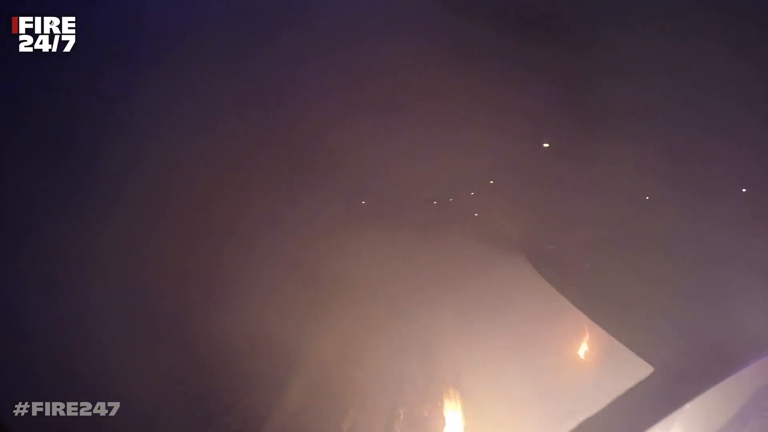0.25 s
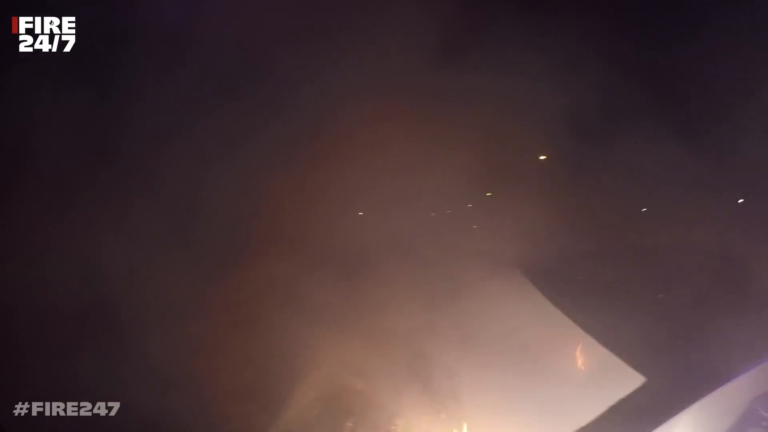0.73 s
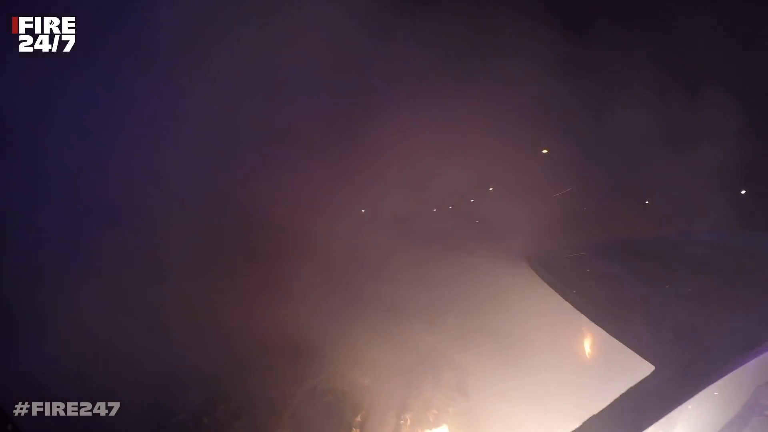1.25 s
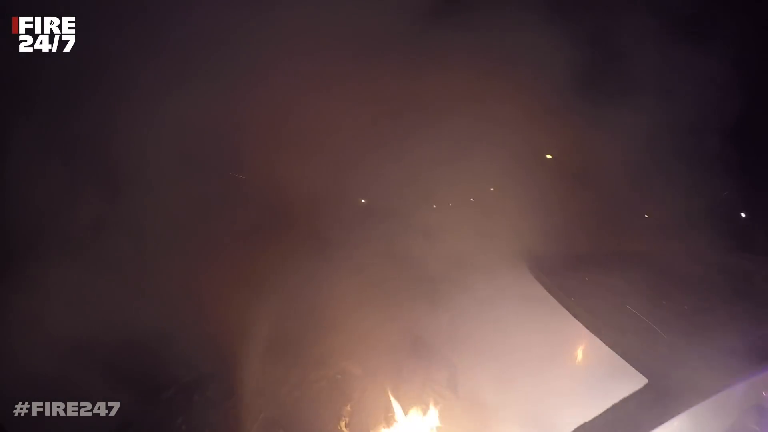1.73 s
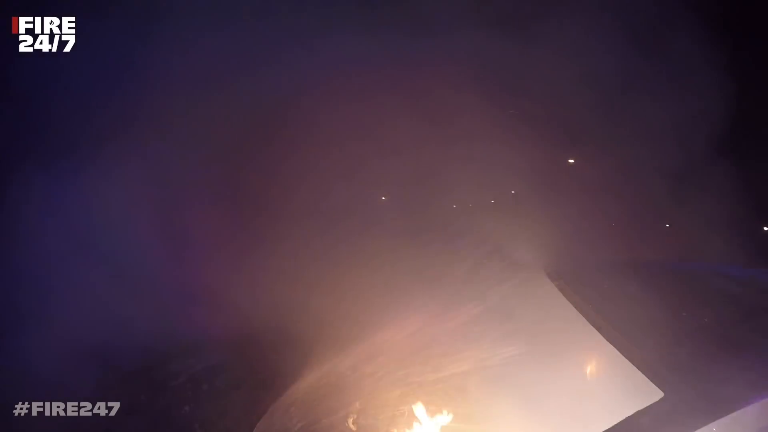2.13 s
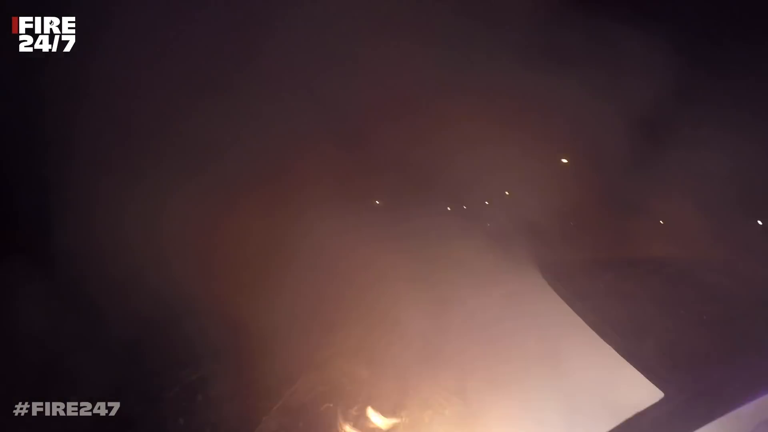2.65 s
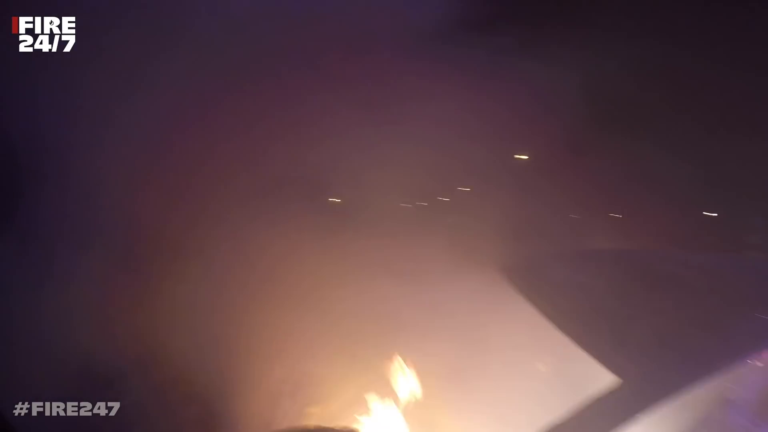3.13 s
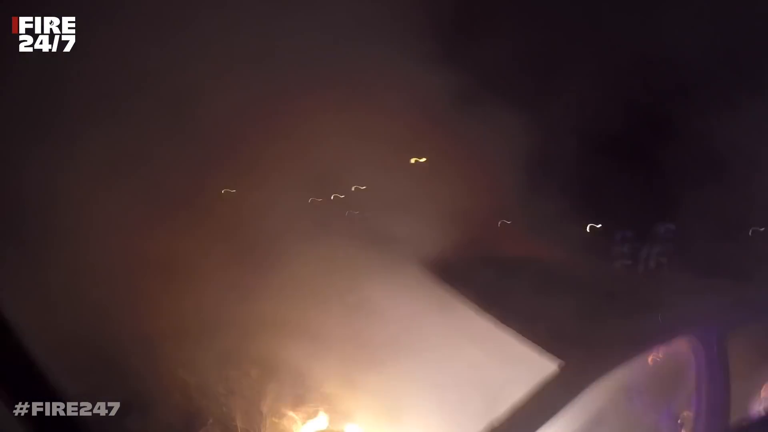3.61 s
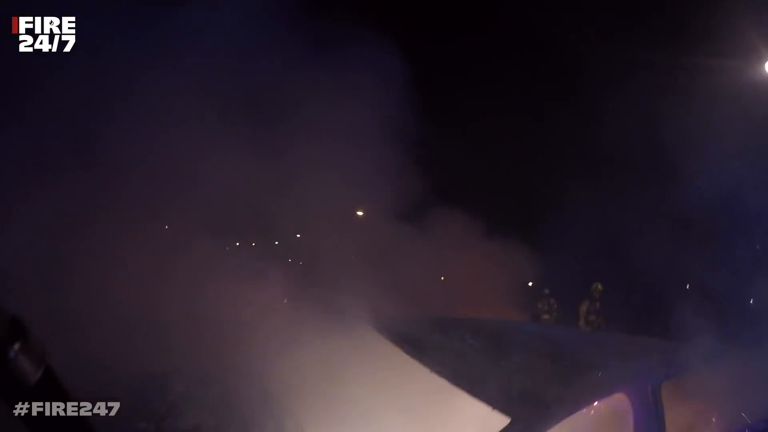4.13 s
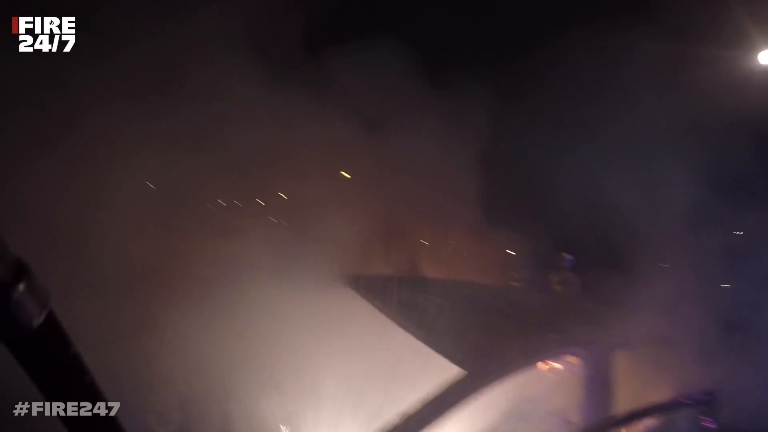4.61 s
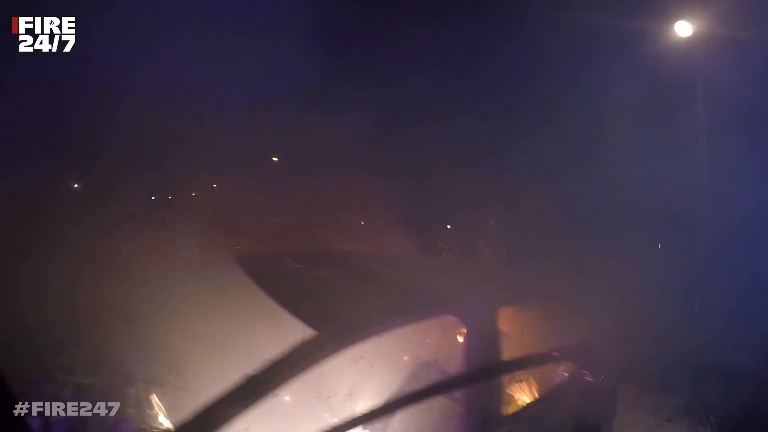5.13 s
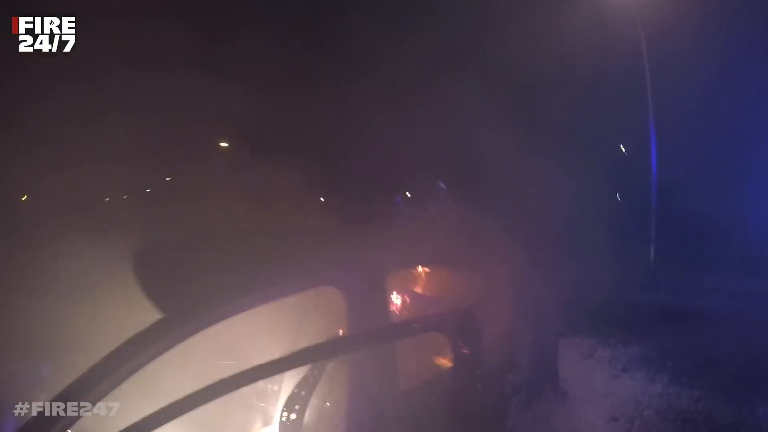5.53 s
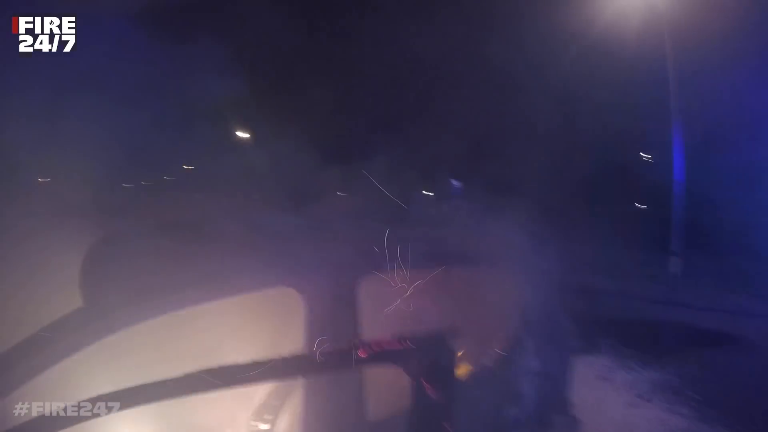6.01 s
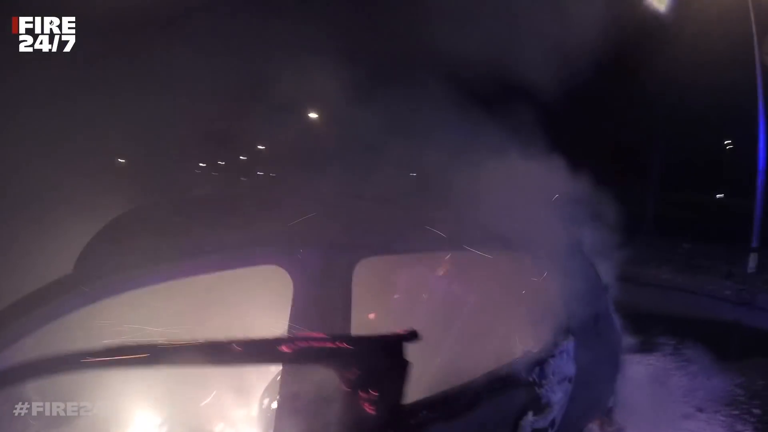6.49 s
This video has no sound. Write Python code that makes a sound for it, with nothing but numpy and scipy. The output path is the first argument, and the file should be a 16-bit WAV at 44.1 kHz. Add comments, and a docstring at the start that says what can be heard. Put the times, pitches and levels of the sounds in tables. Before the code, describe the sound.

Harsh, boxy water spray sweeps across hot car metal, surging and sizzling, briefly dropping out midway as thumps and sharp knocks hit the helmet.

```python
"""A hose jet sweeps over a burning car, heard by a mono camera in a closed housing on a helmet.
From the start water roars, drums on metal, sprays and flashes to steam: noise gated by drops, coloured by the
housing's peaks and dips. Air and movement rumble below it as slow-varying low noise.
From 0.9 s slugs of water slap as noise bursts; from 3.2 s bumps thump as swelling low tones.
The level dips briefly at 3.6 and 3.8 s; from 3.7 s knocks ring the shell as decaying modes."""
import sys
import numpy as np
from scipy import signal
from scipy.fft import rfft, irfft
from scipy.io import wavfile
from scipy.ndimage import uniform_filter1d

SR = 44100
rng = np.random.default_rng(int(sys.argv[2]) if len(sys.argv) > 2 else 0)


def log_audio(samples):
    """Write samples as a 16-bit WAV file to the path given in sys.argv[1]."""
    # one column per channel
    frames = np.atleast_2d(samples).T
    # limit to full scale, then quantise
    limited = np.clip(frames, -1, 1)
    pcm = np.round(limited * 32767).astype(np.int16)
    wavfile.write(sys.argv[1], SR, pcm)


def attenuation_scalar(level_db):
    """Turn a level in dB into a linear amplitude multiplier (20 dB per decade)."""
    decades = np.asarray(level_db, float) / 20
    return 10 ** decades


N = 298116
T = np.arange(N) / SR
HZ = np.fft.rfftfreq(N, 1 / SR) + 1e-3


def unit(x):
    """Scale to rms 1."""
    return x / np.sqrt(np.mean(x ** 2))


def band(x, lo_hz, hi_hz, order=4):
    """Zero-phase band-pass with rounded skirts."""
    low_skirt = 1 + (lo_hz / HZ) ** (2 * order)
    high_skirt = 1 + (HZ / hi_hz) ** (2 * order)
    return irfft(rfft(x) / np.sqrt(low_skirt * high_skirt), N)


def walk(rate_hz):
    """Random levels held 1 / rate_hz and slewed twice; rms 1."""
    hold = int(SR / rate_hz)
    steps = np.repeat(rng.standard_normal(N // hold + 1), hold)
    return unit(uniform_filter1d(uniform_filter1d(steps, hold), hold)[:N])


def swells(rows, rise_s, fall_s):
    """Summed level changes in dB that rise, hold and fall back."""
    total_db = np.zeros(N)
    for start_s, change_db, hold_s in rows:
        corners_s = np.cumsum([0, rise_s, hold_s, fall_s])
        total_db += change_db * np.interp(T - start_s, corners_s, [0, 1, 1, 0])
    return total_db


# broad slope of the housing: (frequency [Hz], gain [dB])
HOUSING_SLOPE = [(150, -15), (500, -16), (1000, -9), (2000, -4.5), (4000, -15.5), (6000, -19.5),
                 (9000, -27), (15000, -38)]
# housing peaks and dips: (centre [Hz], width [Hz], gain facing the jet [dB], gain turned away [dB])
HOUSING_PEAKS = [(698, 29, 9, 4.5), (1363, 30, 5, 5.5), (1520, 110, -6, -2.5), (1760, 750, 1.5, 6),
                 (2354, 79, -5.5, -17), (2506, 84, -14, 3.5), (2927, 120, 7.5, -3), (3106, 104, 1, -8.5),
                 (3398, 535, 12.5, 10.5), (4060, 460, -4.5, 4.5), (4590, 110, -3, 2), (4860, 330, 8, -6),
                 (5485, 210, -16, 1), (5934, 580, -12, -11.5), (6200, 130, 3.5, 1), (6980, 210, 9, -3),
                 (8100, 1900, -4.5, -7.5), (9250, 590, 4.5, 4)]
# head turned away from the jet: (time [s], share [0-1])
HEAD_TURN = [(0, 0.31), (1.0, 0.24), (1.7, 0.18), (2.0, 0.45), (2.6, 0.13), (2.8, 0.62), (3.05, 0),
             (3.3, 0.53), (4.3, 0.46), (4.6, 0.44), (4.8, .9), (5.05, 0.53), (5.6, 0.78), (5.9, 0.8),
             (6.1, 0.95), (6.76, 0.77)]


def housing(x):
    """Minimum-phase filters of the housing, facing and turned away, crossfaded as the head turns."""
    hz = np.fft.rfftfreq(4096, 1 / SR) + 1
    slope_hz, slope_gain_db = np.transpose(HOUSING_SLOPE)
    slope_db = np.interp(np.log(hz), np.log(slope_hz), slope_gain_db)
    away = np.interp(T, *np.transpose(HEAD_TURN))
    out = np.zeros(N)
    for side, share in enumerate([1 - away, away]):
        gain_db = slope_db.copy()
        for row in HOUSING_PEAKS:
            gain_db += row[2 + side] / (1 + (2 * (hz - row[0]) / row[1]) ** 2)
        # folding the cepstrum makes the response causal
        cepstrum = irfft(np.log(attenuation_scalar(gain_db)))
        cepstrum[1:2048] *= 2
        cepstrum[2049:] = 0
        impulse = irfft(np.exp(rfft(cepstrum)))[:2048]
        out += share * signal.oaconvolve(x, impulse)[:N]
    return out


def splashes(per_s, tail_s):
    """Gating by drops: equal sudden rises at random times, each dying away fast; rms 1."""
    hits = (rng.random(N) < per_s / SR).astype(float)
    return unit(signal.lfilter([1], [1, -np.exp(-1 / (tail_s * SR))], hits))


def patchy(x, lo_hz, hi_hz, slow_db, quick_db):
    """Five slices of the spectrum swell and flicker on their own, as drop sizes and targets change."""
    inner_hz = np.geomspace(lo_hz, hi_hz, num=6)[1:-1]
    spectrum = rfft(x)
    out = np.zeros(N)
    for from_hz, to_hz in zip([0, *inner_hz], [*inner_hz, SR]):
        part = irfft(spectrum * (HZ >= from_hz) * (HZ < to_hz), N)
        out += part * attenuation_scalar(slow_db * walk(7) + quick_db * walk(40))
    return out


# where the jet is aimed: (time [s], spray [dB], landing on metal [dB], heat of the target [dB])
JET_AIM = [(0, -31.5, -3.5, -2), (.44, -29.5, -1, -4.5), (.56, -23.5, 3, 1.5), (.75, -22.5, 2, -2),
           (.87, -23.5, 2.5, -4), (1.02, -24, 0, -3), (1.2, -27, 4.5, -2), (1.4, -25, 3, -4.5),
           (1.7, -22.5, 2, -1.5), (1.9, -18.5, 1, -2.5), (2.03, -23.5, -2, -2), (2.45, -22.5, 0, -2.5),
           (2.55, -27, 3.5, 2), (2.8, -25, -1.5, -4.5), (3.28, -25, 4, -3), (3.5, -25, -2.5, 1.5),
           (3.57, -36.5, -5, -4.5), (3.69, -44.5, -9, -5), (3.76, -45, -5, -10), (3.88, -37, 2, -2),
           (3.93, -24.5, -3.5, 2), (4.43, -31.5, 0.5, 2.5), (4.56, -22.5, -1.5, -0.5), (5.1, -24.5, -1, 2),
           (5.7, -26, -1, 0), (5.86, -30, -0.5, 3), (6.0, -28.5, -1, 2), (6.76, -25, -2.5, 2)]
# jet surges, or falters when negative: (start [s], change [dB], hold [s])
JET_SURGES = [(0, 3, .01), (.03, -3, .03), (.09, 2, 0.009), (.33, 0.5, 0.022), (.6, 1.5, 0.095),
              (.74, -2.5, .03), (.83, 3.5, 0.21), (1.3, -5, 0.013), (1.39, 3, 0.099), (2.08, 2.5, 0.047),
              (2.86, 5, 0.03), (3.0, 7.5, 0.014), (3.1, 6, 0.085), (3.29, 5, 0.067), (3.38, 6, 0.046),
              (3.99, 2.5, 0.032), (4.12, -1.5, 0.009), (4.21, -1.5, 0.0083), (4.575, 5, 0.11),
              (4.71, 3, .07), (4.82, -4, 0.011), (4.87, 3.5, .17), (5.23, 3.5, .04), (5.72, -1, 0.064),
              (5.88, 6.5, 0.026), (6.38, -5.5, 0.006), (6.46, 0.5, 0.056)]
# fire flares and is beaten down, and the roar with it: (time [s], change [dB])
FLAME_LEVELS = [(0, -1), (.8, -0.5), (1.5, 3), (2.8, 3), (3.3, -1.5), (3.7, -3), (4.2, 0.5), (4.8, -3.5),
                (5.3, 0.5), (5.7, -2), (6.0, 2), (6.76, 2.5)]
# flashes to steam on hotter metal, or cooler when negative: (start [s], change [dB], hold [s])
STEAM_FLASHES = [(.05, -2, .08), (.5, 2, 0.065), (.66, 1, .07), (1.44, 4.5, 0.075), (2.04, -0.5, .03),
                 (2.12, 3, .15), (2.72, -3.5, 0.11), (3.13, 5, 0.073), (3.22, -1.5, .12), (4.25, 2, .08),
                 (4.7, 1.5, 0.13), (5.1, 2.5, 0.34), (5.74, -1.5, .08), (5.87, 2.5, 0.057), (6.08, 1, .04),
                 (6.35, -3, 0.024)]


def jet():
    """Roar, drumming, spray and steam: bands of noise sharing the surging of the jet and the patter of drops."""
    usual_db, rise_s, fall_s = -25, 0.024, 0.064
    s, *columns = np.transpose(JET_AIM)
    aim_db, metal_db, heat_db = (np.interp(T, s, column) for column in columns)
    change_db = aim_db + swells(JET_SURGES, rise_s, fall_s) - usual_db
    # dB re spray at the usual jet, plus the share of its changes that each part follows
    roar_db = -16.5 + 0.33 * change_db + np.interp(T, *np.transpose(FLAME_LEVELS))
    drum_db = -4.5 + 0.56 * change_db + metal_db
    steam_db = -12 + 0.58 * change_db + heat_db + swells(STEAM_FLASHES, rise_s, fall_s)
    # (low [Hz], high [Hz], level [dB], patter share, surge [dB], slow patches [dB], quick patches [dB])
    parts = [(154.3, 672, roar_db, 0.29, 0.19, 2.87, 0.37),
             (820, 2035, drum_db, 0.19, 0.53, 1.05, 1.2),
             (2387, 6570, change_db, 0.18, 0.38, 1.3, 1.3),  # spray
             (5310, 16400, steam_db, 0.16, 1.0, 0.53, 1.1)]
    surge, patter = walk(45), splashes(per_s=250, tail_s=0.0018)
    out = np.zeros(N)
    for lo_hz, hi_hz, level_db, share, surge_db, slow_db, quick_db in parts:
        gate = 1 + share * (patter - 1)
        water = rng.standard_normal(N) * gate * attenuation_scalar(surge_db * surge)
        coloured = band(housing(water), lo_hz, hi_hz, order=6)
        part = patchy(coloured, lo_hz, hi_hz, slow_db, quick_db)
        out += unit(part) * attenuation_scalar(usual_db + level_db)
    return out


# how hard air and wearer move: (time [s], buffeting [dB], shell boom [dB])
RUMBLE_LEVELS = [(0, -34.5, -54.5), (.45, -39.5, -47.5), (.9, -37, -50.5), (1.3, -39.5, -50),
                 (2.0, -39, -39), (2.6, -43, -44.5), (2.9, -34.5, -51.5), (3.5, -31.5, -39),
                 (3.85, -26.5, -37), (4.1, -33.5, -37.5), (4.4, -29, -41), (4.6, -37.5, -35),
                 (5.3, -35.5, -37.5), (5.6, -25, -39.5), (5.83, -34, -48), (6.0, -30, -36.5),
                 (6.2, -30, -47), (6.5, -36, -51.5), (6.76, -32.5, -41.5)]
# gusts on the port: (start [s], change [dB], hold [s])
AIR_GUSTS = [(0.244, 5, .02), (0.476, 11, 0.032), (.68, 5, .03), (0.856, 7, .04), (1.34, 5, .04),
             (1.5, 8, .05), (1.84, 5, .05), (2.374, 5, 0.034), (2.52, 6, .02), (3.05, 5, 0.033),
             (3.53, 6, 0.035), (4.088, 11, .04), (4.28, 7, 0.035), (4.383, 4, .02), (6.607, 7.5, 0.035)]
# shakes that make the shell boom: (start [s], change [dB], hold [s])
SHELL_SHAKES = [(0, 10.5, .03), (.16, 6, 0.018), (.42, 5, 0.092), (.69, 10, .05), (1.0, 9, .03),
                (1.347, 10.5, 0.027), (1.513, 10, 0.14), (2.03, 6.5, 0.063), (2.38, 2.5, 0.034),
                (2.605, 10, .02), (2.96, 7, .03), (3.192, 18.5, 0.024), (3.838, 7.5, 0.065),
                (5.434, 11, 0.023), (5.7, 6, .03), (6.605, 10.5, .04)]


def rumble():
    """Air buffets the port in gusts; the helmet shell booms near its lowest mode: two bands of low noise."""
    s, air_db, boom_db = np.transpose(RUMBLE_LEVELS)
    air = rng.standard_normal(N) * attenuation_scalar(2.0 * walk(30))
    shaking = rng.standard_normal(N) * attenuation_scalar(1.15 * walk(25))
    out = np.zeros(N)
    for push, db, rows, lo_hz, hi_hz, order in [(air, air_db, AIR_GUSTS, 16, 40, 2),
                                                (shaking, boom_db, SHELL_SHAKES, 100, 124, 6)]:
        level_db = np.interp(T, s, db) + swells(rows, rise_s=0.03, fall_s=0.085)
        steady_rms = np.std(band(push, lo_hz, hi_hz, order))
        out += band(push * attenuation_scalar(level_db), lo_hz, hi_hz, order) / steady_rms
    # the padding passes little above the boom
    return band(out, 4.4, 125, order=5)


# heavy slaps of water: (time [s], level at onset before the housing [dB])
WATER_SLAPS = [(.9258, 2), (3.0362, 4), (3.386, 4), (5.9215, 1), (4.6002, 10)]


def slaps():
    """A slug of water lands at once: a sharp noise burst with a short tail, through the housing."""
    gate = np.zeros(N)
    for s, level_db in WATER_SLAPS:
        gate += attenuation_scalar(level_db) * (T >= s) * np.exp(-np.abs(T - s) / 0.0035)
    return band(housing(gate * rng.standard_normal(N)), 1700, 4600, order=2)


# soft bumps on the helmet: (time [s], envelope peak [dB], tone [Hz], rise [s], sign)
HELMET_BUMPS = [(3.225, -16, 65, .012, 1), (4.187, -12, 205, .007, -1), (3.985, -11, 30, .016, -1),
                (3.7045, -7, 66, .008, 1), (3.7385, -14, 100, .005, 1), (3.948, -7, 40, .012, 1),
                (4.186, -4, 125, .005, -1), (5.618, -12, 48, .011, 1), (6.042, -13, 36, .02, 1),
                (6.088, -16, 60, .007, 1), (6.292, -5, 70, .008, 1), (6.333, -15, 36, .018, -1)]


def thumps():
    """A padded blow swings the capsule: a swell and fade on a low tone."""
    out = np.zeros(N)
    for s, peak_db, hz, rise_s, sign in HELMET_BUMPS:
        t = np.maximum(T - s, 0)
        envelope = t / rise_s * np.exp(1 - t / rise_s)
        out += sign * attenuation_scalar(peak_db) * envelope * np.sin(2 * np.pi * hz * t)
    return out


# the sound drops out briefly: (time [s], depth [dB], width [s])
LEVEL_DIPS = [(3.629, -17, .006), (3.786, -15, .005)]


def dips():
    """Gain with brief bell-shaped dips in dB."""
    return attenuation_scalar(sum(depth_db * np.exp(-((T - s) / width_s) ** 2) for s, depth_db, width_s in LEVEL_DIPS))


# hard knocks on the shell: (time [s], peak [dB], hardness [dB per octave], rattle length [s])
SHELL_KNOCKS = [(3.681, -36, 8, .004), (6.294, -23, -1, .012), (6.335, -26, -1, .012),
                (3.7036, -17, -4, .004), (3.7294, -6.5, 4, .0035), (4.1843, 6, 3, .0035)]
# what the shell rings with: (mode [Hz], level at 1500 Hz tilt pivot [dB], t60 [s])
SHELL_MODES = [(310, -5, 0.072), (383, -4.5, 0.039), (512, -3.5, 0.03), (780, 2.5, 0.0098),
               (1050, 0.5, 0.012), (1390, -4, 0.013), (1940, 5.5, 0.0085), (2200, 3, 0.027),
               (2480, 2, 0.0041), (2900, -12, .008), (3360, -15, .008), (4560, -20, .008),
               (5830, -24, 0.0042), (6900, -29, .006), (9400, -37, .005)]


def knocks():
    """Contact sustains the shell modes while it rattles, then they ring out; harder contact favours high ones."""
    out, t = np.zeros(N), T[:4000]
    for s, peak_db, hard_db, rattle_s in SHELL_KNOCKS:
        free_s = np.maximum(t - rattle_s, 0)
        roughness = uniform_filter1d(rng.standard_normal(len(t)), size=10)
        chatter = 1 + 0.75 * roughness * (t < rattle_s)
        ring = np.zeros(len(t))
        for hz, mode_db, t60_s in SHELL_MODES:
            gain = attenuation_scalar(mode_db + hard_db * np.log2(hz / 1500))
            decay = np.exp(-np.log(1000) * free_s / t60_s)
            ring += gain * np.sin(2 * np.pi * (hz * t + rng.random())) * decay
        blow = ring * chatter * np.minimum(t / 0.00056, 1)
        start = int(s * SR)
        out[start:start + len(t)] += attenuation_scalar(peak_db) * blow / np.abs(blow).max()
    return out


def scene():
    """Water through the housing plus all that touches the housing; one capsule on both channels."""
    mono = (jet() + rumble()) * dips() + slaps() + thumps() + knocks()
    return np.array([mono, mono])


def low_pass(x):
    """Removes everything above the highest recorded frequency."""
    return signal.sosfilt(signal.butter(12, 16340, fs=SR, output="sos"), x)


def record(dry):
    """The input stage rounds the loudest peaks and cuts the top."""
    rounded = dry / (1 + np.abs(dry / .9) ** 4) ** (1 / 4)
    top_cut = signal.ellip(12, .3, 70, 15400, fs=SR, output="sos")
    mix = signal.sosfilt(top_cut, rounded)
    return low_pass(mix)


dry = scene()
out = record(dry)
log_audio(out)
```